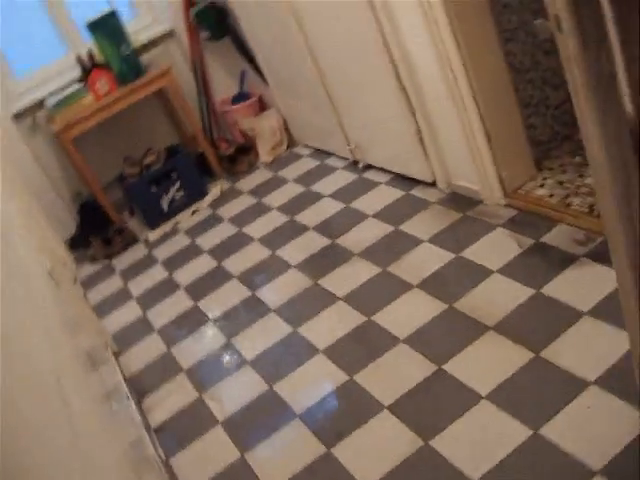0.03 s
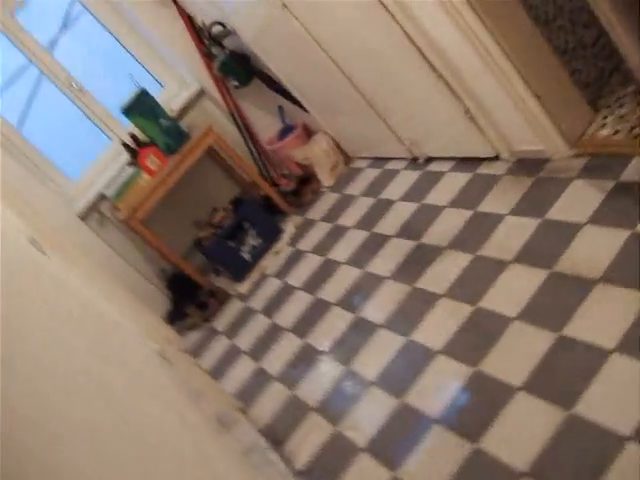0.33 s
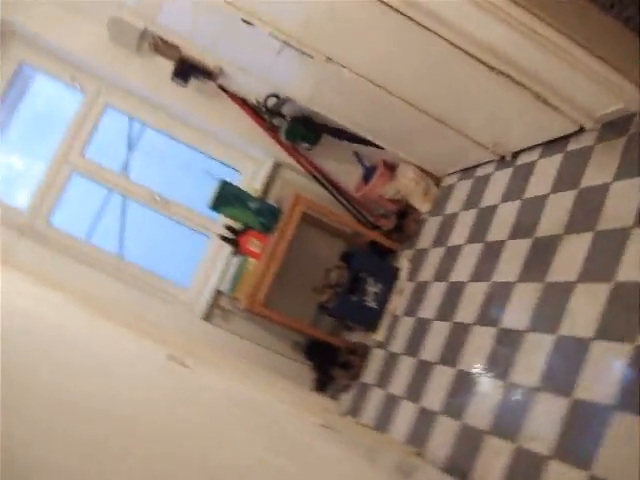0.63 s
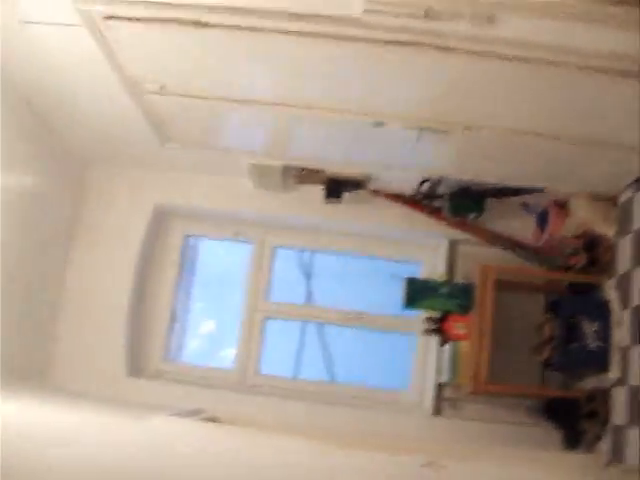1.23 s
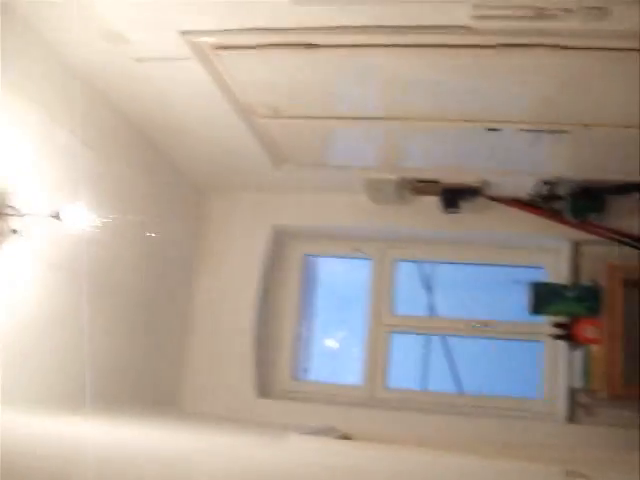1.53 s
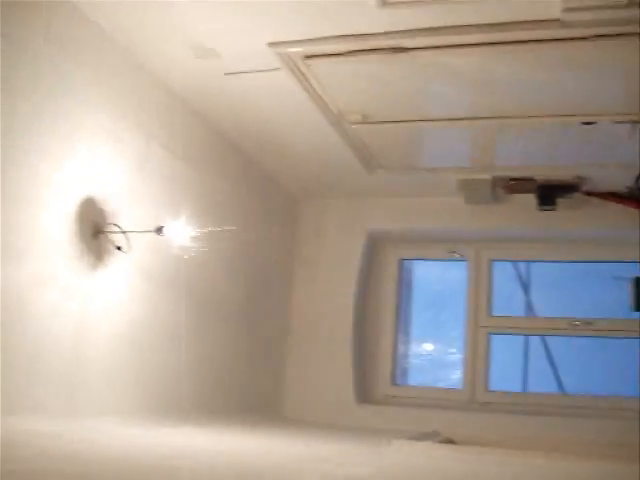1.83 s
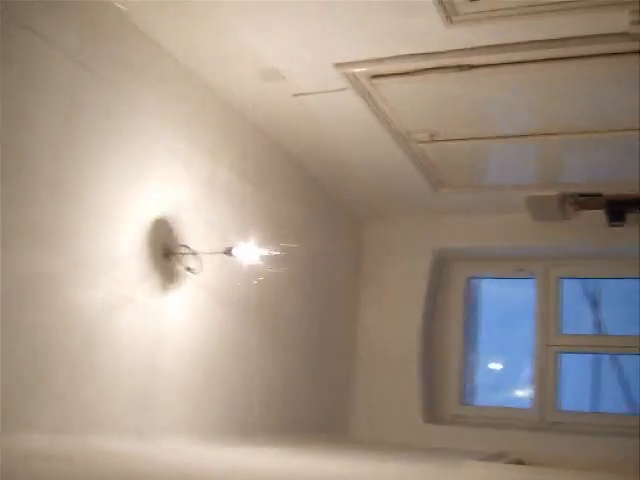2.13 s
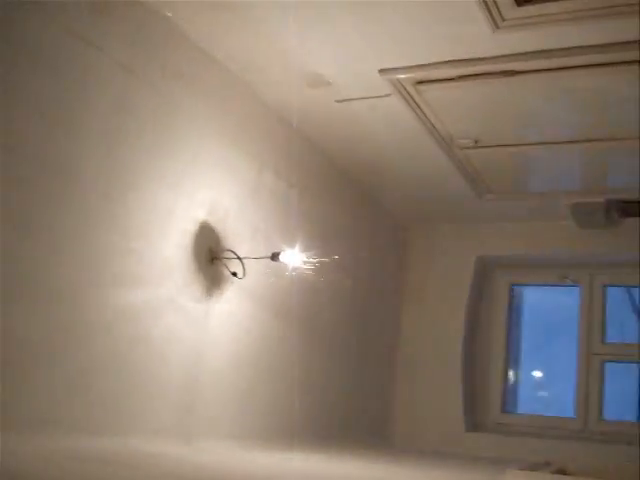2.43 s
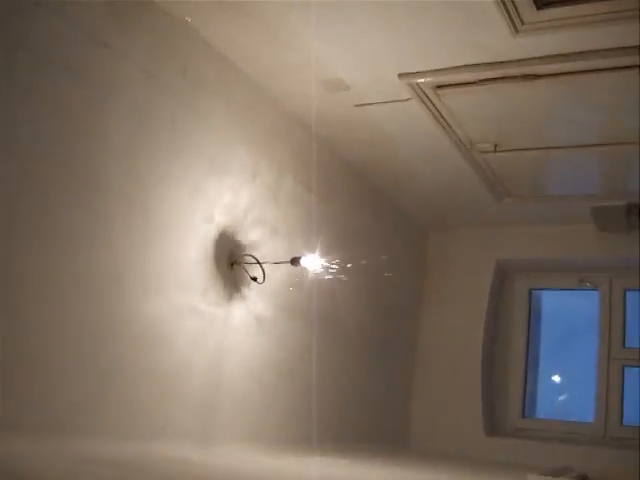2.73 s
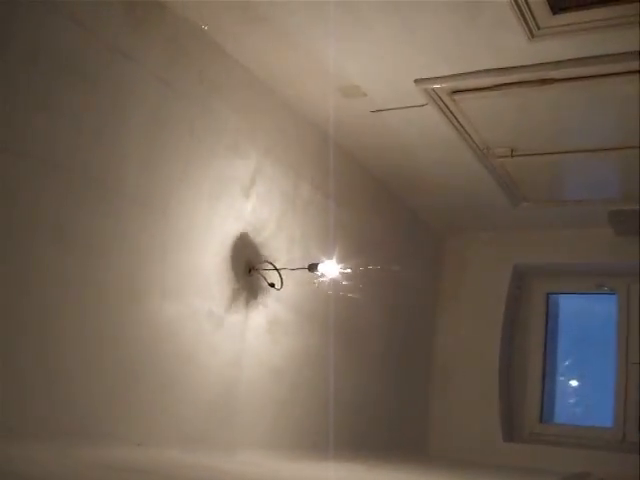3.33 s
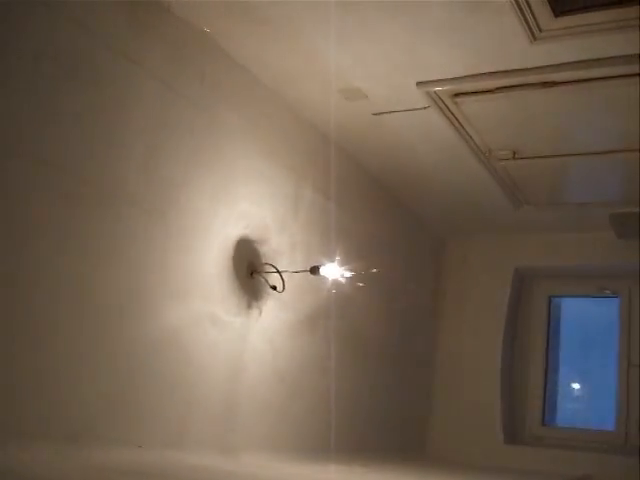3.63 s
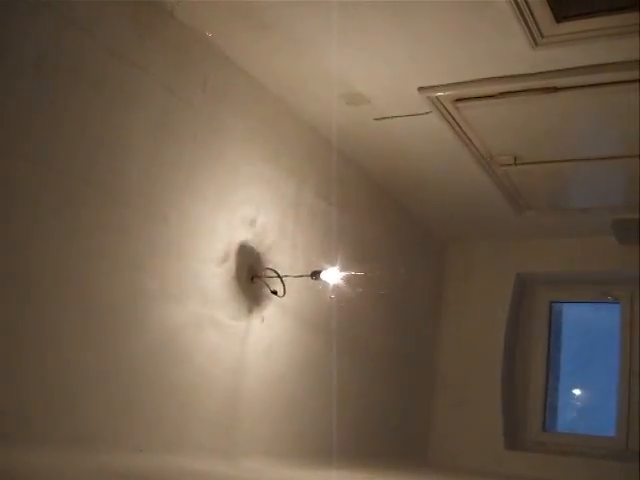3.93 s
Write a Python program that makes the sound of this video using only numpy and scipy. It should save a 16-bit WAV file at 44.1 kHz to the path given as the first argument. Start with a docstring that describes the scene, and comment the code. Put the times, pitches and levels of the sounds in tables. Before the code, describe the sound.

Water drips sharply onto wet tiles throughout, several uneven drops a second, with fine spray pattering between and a short bright room echo. The strongest splats come at the start, around 2.1 seconds and near 3.6 to 3.8. Dull distant thuds sound near 1 and 2.4 seconds. Soft microphone bumps come around 0.3 and from 1.7 to 2.3 seconds. A steady hiss and faint hum lie underneath.

```python
"""Sharp slaps of water, leaking from a ceiling onto the wet tiles of a small, bare room.
Each drop excites two broad resonances, throws off droplets and sets the room ringing brightly.
Fine spray patters between the drops. A few dull thuds sound further off, a hand knocks on the
microphone, and a faint building hum wavers under a steady hiss."""
import sys
import numpy as np
from scipy import signal
from scipy.fft import rfft, irfft, next_fast_len
from scipy.io import wavfile

SR = 44100
rng = np.random.default_rng(int(sys.argv[2]) if len(sys.argv) > 2 else 0)


def put_to_file(sound):
    """Save the sound as 16-bit audio at rate SR, in the file named by the first command-line argument."""
    columns = np.atleast_2d(sound).T  # one column per channel
    safe = np.clip(columns, -1, 1)
    whole_steps = np.round(safe * 32767)
    wavfile.write(sys.argv[1], SR, whole_steps.astype(np.int16))


N = 176400
N_FFT = 32768
BIN_HZ = np.maximum(np.arange(N_FFT // 2 + 1) * SR / N_FFT, 1)


def gain(db):
    """Decibels to amplitude."""
    return 10 ** (np.asarray(db) / 20)


def log_interp(hz, points):
    """Join (f/Hz, value) points on a log-frequency axis."""
    point_hz, values = np.array(points).T
    return np.interp(np.log(np.maximum(hz, 1)), np.log(point_hz), values)


def equalise(x, curve):
    """Filter by a (f/Hz, level/dB) curve."""
    size = next_fast_len(N + N_FFT)
    hz = np.arange(size // 2 + 1) * SR / size
    return irfft(rfft(x, size) * gain(log_interp(hz, curve)), size)[..., :N]


def resonance(hz, width_hz, peak_db):
    """Spectrum of a steep band-pass after one push."""
    return gain(peak_db) / (1 + 1j * (BIN_HZ ** 2 - hz ** 2) / (BIN_HZ * width_hz)) ** 2


def add(out, start_s, sound):
    """Mix a sound in at start_s."""
    i = int(np.clip(start_s * SR, 0, N - 1))
    out[..., i:i + sound.shape[-1]] += sound[..., :N - i]


# Left-right difference: f/Hz, level/dB
SIDE_CURVE = [(700, -42), (1800, -41), (2080, -11), (3000, -23.5), (4000, -22), (5200, -62.5),
              (6100, -24.5), (8000, -8.5), (9500, -12.5)]

def stereo(mid, unrelated):
    """Nearly mono: left and right differ by some unrelated treble."""
    side = equalise(unrelated, SIDE_CURVE)[:len(mid)]
    return np.array([mid + side, mid - side])


# Room decay: f/Hz, T60/s
ROOM_DECAY = [(500, 0.46), (2000, 0.6), (4500, 0.77), (8000, 0.74)]
# First reflections off floor and walls: delay/s, level/dB re whole tail
REFLECTIONS = [(.0078, -19), (0.014, -15), (0.0184, -21.5), (.0238, -23.5)]

def room(build_s=0.0052, sparse_s=0.02, path_scatter=0.05):
    """Stereo room spectrum from one spot: first reflections, then echoes thickening to a smooth tail."""
    t = np.arange(N_FFT) / SR
    sparseness = 0.39 * np.exp(-t / sparse_s)
    grains = np.repeat(rng.standard_normal(N_FFT // 32), 32)
    clumping = np.exp(sparseness * grains - sparseness ** 2)
    noise = rfft(rng.standard_normal((2, N_FFT)) * clumping)
    tail = 0
    for hz, t60_s in ROOM_DECAY:
        band = log_interp(BIN_HZ, [(f, f == hz) for f, _ in ROOM_DECAY])
        tail += irfft(noise * band) * np.exp(-np.log(1000) * t / t60_s)
    tail *= 1 - np.exp(-t / build_s)
    tail /= np.sqrt(np.sum(tail ** 2) / 2)
    for delay_s, db in REFLECTIONS:
        arrival_s = abs(delay_s * (1 + path_scatter * rng.standard_normal()))
        tail[0, int(arrival_s * SR)] += gain(db)
    return rfft(stereo(*tail))


# Hiss spectrum: f/Hz, relative density/dB
HISS_CURVE = [(20, -13.5), (30, 8), (44, -1), (80, -3), (170, -3), (290, -2), (450, 1), (1000, 3.5),
              (1500, -2.5), (2500, 0), (4500, 1.5), (7200, -2), (9000, -8.5), (11000, -23)]

def hiss(rms_db=-39):
    """Steady broadband noise."""
    noise = equalise(rng.standard_normal((2, N)), HISS_CURVE)
    return stereo(*noise / noise.std()) * gain(rms_db)


# Building hum: t/s, low tone level/dB, high tone level/dB
HUM_LEVELS = [(0, -74, -70), (.37, -66, -64), (.86, -69, -62), (1.05, -57, -72), (1.45, -59, -70),
              (1.7, -72, -70), (2.7, -66, -70), (3.02, -70, -72), (3.17, -67, -56), (3.45, -60, -66),
              (3.8, -50, -66), (4, -52, -66)]

def hum(low_hz=63, high_hz=113):
    """The building hums on two low tones, each wavering in level."""
    t = np.arange(N) / SR
    times_s, low_db, high_db = np.array(HUM_LEVELS).T
    out = np.zeros(N)
    for hz, rms_db in (low_hz, low_db), (high_hz, high_db):
        amplitude = np.sqrt(2) * gain(np.interp(t, times_s, rms_db))
        out += amplitude * np.sin(2 * np.pi * hz * t)
    return out


# Thuds across the room: t/s, f/Hz, width/Hz, level/dB
FAR_THUDS = [(.837, 1260, 1100, 11), (.998, 840, 900, 15.5), (1.003, 644, 149, 18), (1.003, 230, 91, 11.5),
             (2.437, 980, 397, 11.5)]

def thuds(direct_db=-12):
    """Dull, distant thuds, heard mostly through the room."""
    out = np.zeros((2, N))
    for start_s, hz, width_hz, db in FAR_THUDS:
        add(out, start_s, irfft(resonance(hz, width_hz, db) * (gain(direct_db) + room())))
    return out


# Hand on the microphone: t/s, f/Hz, width/Hz, level/dB
HAND_KNOCKS = [(0.222, 565, 394, 11.5), (.280, 519, 194, 18), (.286, 555, 257, 14.5),
               (0.2859, 993, 437, 13), (1.734, 416, 123, 3), (1.77, 416, 98, 10), (1.972, 420, 298, 2),
               (1.998, 510, 297, 4), (2.181, 457, 220, 9.5), (2.313, 444, 200, 6)]

def knocks(room_db=-12):
    """A hand bumps the microphone itself, so the knocks are almost dry."""
    out = np.zeros((2, N))
    for start_s, hz, width_hz, db in HAND_KNOCKS:
        add(out, start_s, irfft(resonance(hz, width_hz, db) * (1 + gain(room_db) * room())))
    return out


def spray(rate_per_s=60, centre_hz=6300, scatter_oct=0.22, direct_db=-7):
    """Fine spray lands at random, each tick with its own pitch and size."""
    response = irfft(gain(direct_db) + room())
    ticks = np.zeros(N)
    count = int(rate_per_s * N / SR)
    for k, (jitter, pitch, size) in enumerate(rng.standard_normal((count, 3))):
        tick = resonance(centre_hz * 2 ** (scatter_oct * pitch), width_hz=2200, peak_db=-5 + 2.5 * size)
        add(ticks, (k + jitter) / rate_per_s, irfft(tick))
    return signal.fftconvolve(ticks[None], response)[:, :N]


def droplets(drop_db, count=10, mean_flight_s=0.055, centre_hz=7200, scatter_oct=0.24):
    """Spectrum of droplets ticking down around a drop, the late ones weaker."""
    flights_s = rng.exponential(mean_flight_s, count)
    ticks = 0
    for flight_s, (pitch, size_db) in zip(flights_s, rng.standard_normal((count, 2))):
        hz = centre_hz * 2 ** (scatter_oct * pitch)
        tick = resonance(hz, width_hz=710, peak_db=drop_db - 15 + size_db)
        weakening = np.exp(-0.5 * flight_s / mean_flight_s)
        delay = np.exp(-2j * np.pi * BIN_HZ * flight_s)
        ticks += tick * weakening * delay
    return ticks


def splash(decay_s=0.0011, fizz_re_push_db=3.5):
    """Spectrum of the contact: one push and a millisecond of flung water."""
    fizz = rng.standard_normal(N_FFT) * np.exp(-np.arange(N_FFT) / SR / decay_s)
    fizz /= np.linalg.norm(fizz)
    fizz_gain = gain(fizz_re_push_db)
    return (1 + fizz_gain * rfft(fizz)) / np.hypot(1, fizz_gain)


# Drops and after-splashes: t/s; low resonance f/Hz, width/Hz, level/dB;
# high resonance f/Hz, width/Hz, level/dB; direct path level/dB
DROP_IMPACTS = [(.0036, 2530, 1100, 27, 5160, 1200, 20.5, -5), (.004, 1780, 900, 22, 4110, 900, 24, -7.5),
                (.0044, 1000, 700, 11.5, 6800, 2210, 11, -5.5),
                (0.1209, 4980, 3200, 19.5, 7650, 3100, 16.5, -6.5),
                (0.3181, 2950, 2700, 18, 7350, 3000, 6, -8), (0.5556, 4230, 1200, 10.5, 7200, 2970, 4, -10),
                (0.6737, 5360, 2200, 9, 6930, 2500, 9.5, -15), (0.7716, 4500, 2000, 1, 6400, 1710, 13, -10),
                (0.8682, 4800, 2000, 8, 7480, 1880, 14.5, -13),
                (0.9338, 4820, 2260, 13, 6730, 2300, 14, -8.5),
                (1.0466, 4000, 2560, 19, 7200, 3170, 17, -9.5), (1.311, 4550, 1600, 10, 7060, 2220, 17, -6),
                (1.319, 5200, 2000, 6, 6950, 1600, 19.5, -10),
                (1.3757, 4000, 2800, 13, 7350, 2270, 15.5, -8.5),
                (1.5337, 4600, 2660, 12, 6900, 2500, 18.5, -10.5),
                (1.7772, 4800, 2200, 7, 7060, 2200, 14.5, -9.5),
                (1.885, 4800, 2220, -6, 7100, 2180, 9, -8.5), (1.972, 4800, 2200, -2, 7170, 2500, 7, -17),
                (2.0719, 3725, 1300, 14.5, 7000, 2500, 4, -6),
                (2.0796, 2150, 1200, 25, 5100, 1200, 21.5, -12),
                (2.0809, 1296, 940, 18.5, 3830, 960, 22.5, -3),
                (2.0872, 1800, 1500, 18, 6640, 2520, 13.5, -10),
                (2.157, 4970, 2500, 5, 6700, 1830, 23, -11.5),
                (2.172, 5100, 2500, -1, 7200, 2800, 10.5, -8),
                (2.3917, 3680, 2000, 2.5, 6300, 3520, 6.5, -7),
                (2.5153, 4570, 2380, 6, 7330, 2500, 11.5, -14), (2.775, 4200, 2400, 4, 7000, 2650, 10, -15),
                (2.86, 4830, 1992, 8, 7260, 2490, 5.5, -18),
                (2.9676, 4000, 2400, 15.5, 7730, 1900, 15, -10),
                (3.03, 5000, 2000, 7.5, 7340, 2620, 15.5, -6.5),
                (3.041, 5370, 2000, 7, 6800, 2210, 15.5, -5), (3.1974, 4800, 3000, 13, 7030, 2400, 13, -13),
                (3.3236, 4340, 2000, 3, 6900, 2800, 10, -10),
                (3.6115, 4060, 1200, 16.5, 6250, 910, 21.5, -9),
                (3.618, 7400, 700, 16.5, 8620, 705, 10.5, -6),
                (3.663, 2020, 1600, 1.5, 4140, 2500, 8, -3.5),
                (3.697, 6140, 1510, 13.5, 7600, 2020, 12, -8.5),
                (3.753, 4380, 2000, 8, 6450, 2400, -7, -13),
                (3.8045, 4020, 1680, 23.5, 6860, 2970, 15, -2.5),
                (3.8119, 2810, 1720, 13.5, 7500, 2500, 7.5, -9.5),
                (3.995, 4000, 1800, -2, 5800, 2200, 19, -13)]

def drops():
    """Each drop slaps the wet tiles, scatters droplets and sets the room ringing."""
    out = np.zeros((2, N))
    for start_s, low_hz, low_width_hz, low_db, high_hz, high_width_hz, high_db, direct_db in DROP_IMPACTS:
        slap = resonance(low_hz, low_width_hz, low_db) - resonance(high_hz, high_width_hz, high_db)
        direct = gain(direct_db) * splash()
        add(out, start_s, irfft(slap * (direct + room()) + droplets(high_db)))
    return out


def scene():
    """Hiss and hum behind; thuds, knocks and spray between; drops in front."""
    return hiss() + hum() + thuds() + knocks() + spray() + drops()


# Microphone response: f/Hz, level/dB
MIC_CURVE = [(1000, 0.5), (2500, 2.5), (3100, 1.5), (3800, 1), (7500, 1), (8700, 1), (9300, -4.5),
             (10000, -13.5), (10500, -29)]

def record(dry, ceiling=0.8, cutoff_hz=10400):
    """A small, dull-topped microphone: loud peaks rounded, treble cut steeply."""
    coloured = equalise(dry, MIC_CURVE)
    rounded = coloured / (1 + (coloured / ceiling) ** 6) ** (1 / 6)
    lowpass = signal.ellip(8, 0.2, 70, cutoff_hz, fs=SR, output="sos")
    return signal.sosfilt(lowpass, rounded)


dry = scene()
out = record(dry)
put_to_file(out)
```